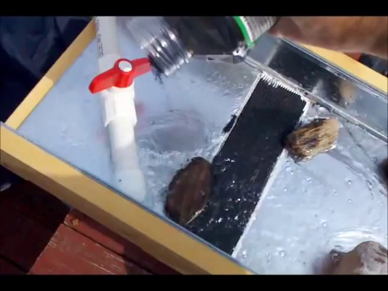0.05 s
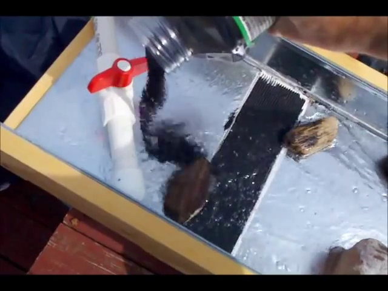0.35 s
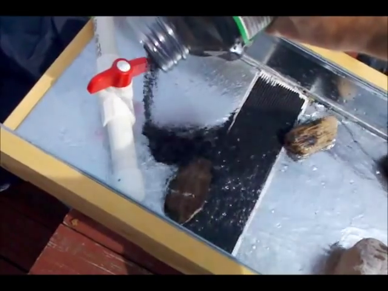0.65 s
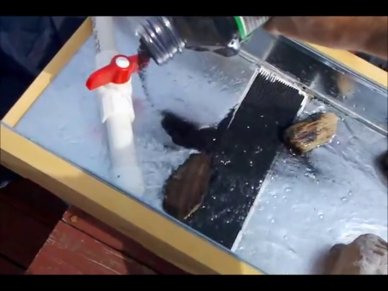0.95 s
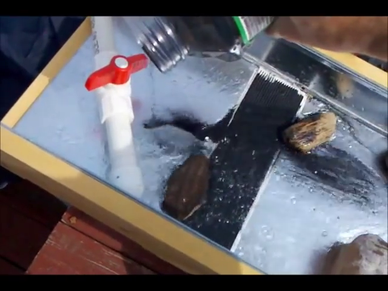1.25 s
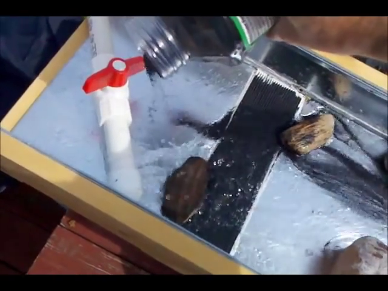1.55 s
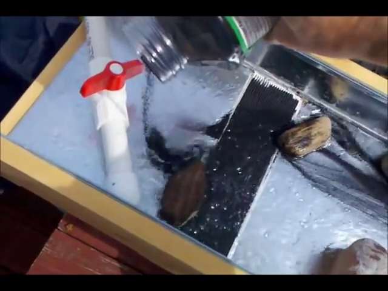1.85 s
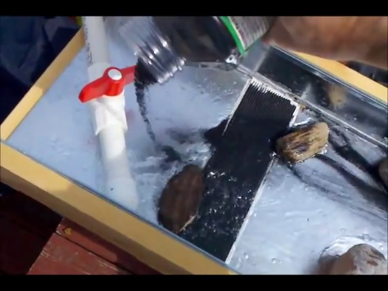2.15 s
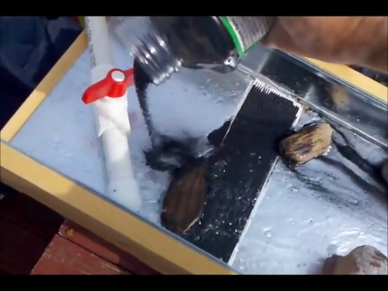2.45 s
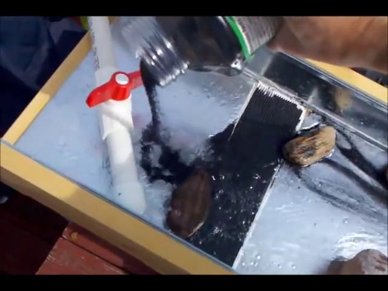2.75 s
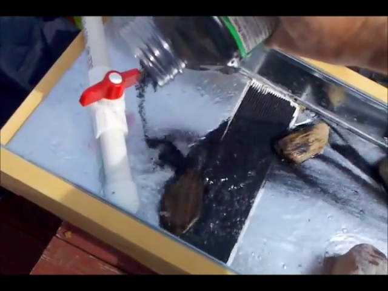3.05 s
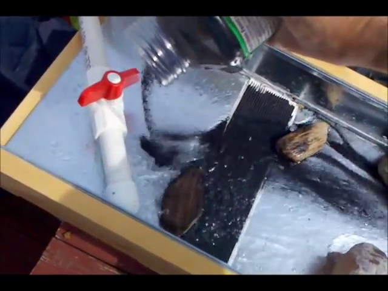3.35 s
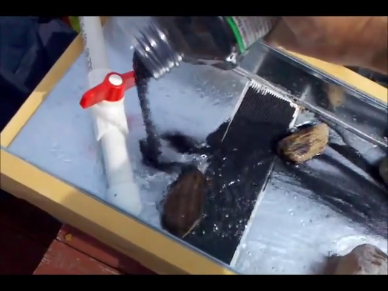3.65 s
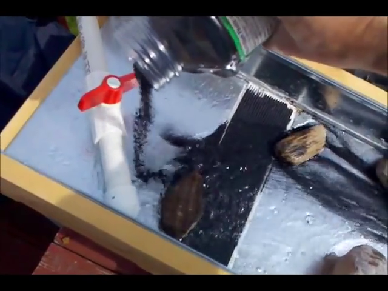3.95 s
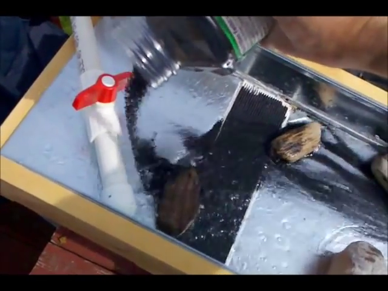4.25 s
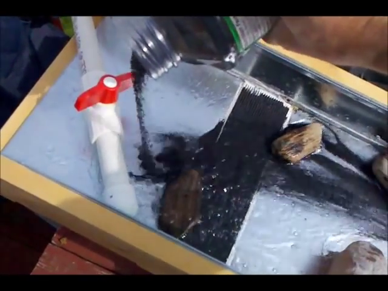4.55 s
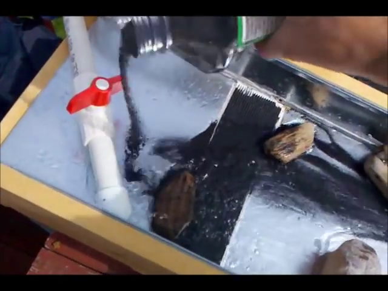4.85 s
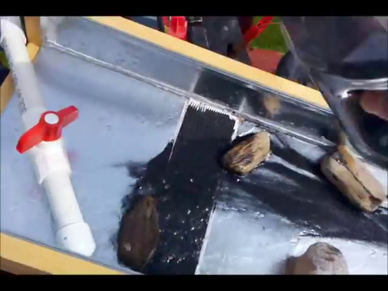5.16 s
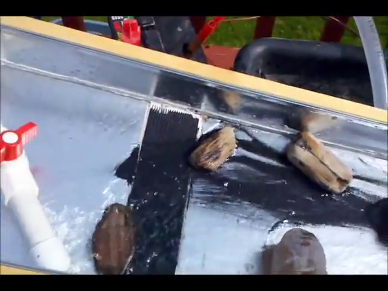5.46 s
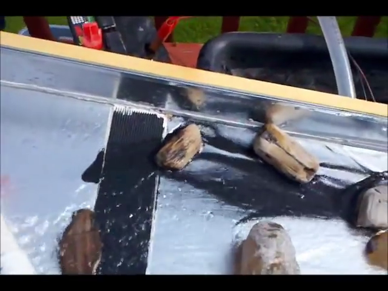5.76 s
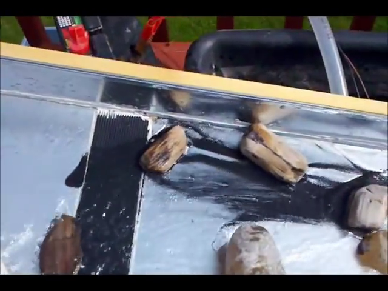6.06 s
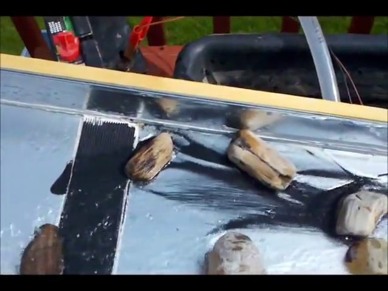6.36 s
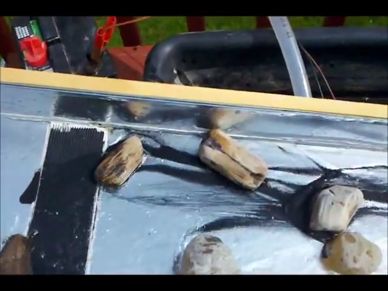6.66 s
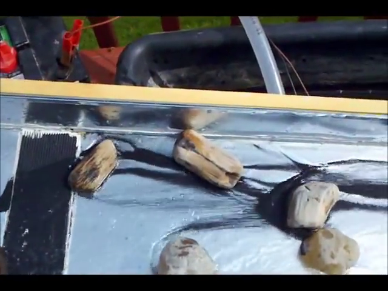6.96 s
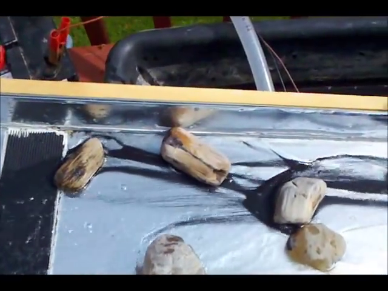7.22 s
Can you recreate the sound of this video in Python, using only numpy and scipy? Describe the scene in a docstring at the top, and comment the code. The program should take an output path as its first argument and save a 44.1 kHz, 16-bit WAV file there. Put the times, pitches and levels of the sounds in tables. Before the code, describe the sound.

A low pump hum and a hollow, pulsing pipe drone run under the steady gurgle and fizz of water flowing into a metal tray outdoors. Occasional high drop ticks and soft plips sound close to the microphone. In the last third, the microphone shifts along the tray with a few brief wind rumbles, and a brighter trickle around stones rises, with little splashes, more bubbles and a slightly stronger whine from the pump.

```python
"""A small pump feeds water from a plastic pipe into a shallow metal tray outdoors.
From the start the pump hums, the pipe booms and throbs hollowly, and the outflow churns and sprays.
Soon bubbles plip and drops tick close to a hand-held microphone with two ports (sound openings).
After five seconds a few puffs of air brush it as it moves along the tray to some stones. There
ripples splash, and the trickle of the water and the whine of the nearby pump grow louder."""
import sys
import numpy as np
from scipy import signal
from scipy.io import wavfile

SR = 44100
rng = np.random.default_rng(int(sys.argv[2]) if len(sys.argv) > 2 else 0)


def transcribe(u):
    """Save the signal u as a 16-bit wav file named by the first command-line argument.

    u: samples, shape (n,) or (channels, n), limited to [-1, 1]; the rate is SR.
    q: integer samples, one column per channel.
    """
    v = np.clip(np.atleast_2d(u).T, -1, 1)
    q = np.round(v * 32767).astype(np.int16)
    wavfile.write(sys.argv[1], SR, q)


N = 330309
TIME = np.arange(N) / SR
PUMP_HZ = 95.6

# How alike the two ports hear the water. Each row: frequency in Hz, likeness (1 means the same).
PORT_LIKENESS = [(40, 0.0088), (110, 0.88), (220, 0.95), (370, 0.92), (520, 0.81), (700, 0.51),
                 (1000, 0.026), (2000, 0.095), (14000, 0.43)]
# Tone of the water at the stones. Each row: frequency in Hz, relative strength in dB.
TRICKLE_TONE = [(2800, -27), (3300, -5), (4000, -15.5), (4900, 2), (5500, -7.5), (7000, -10.5), (9500, -5)]


def from_db(db):
    """Turn decibels into a number to multiply by."""
    return 10 ** (np.asarray(db) / 20)


def rms_one(x):
    """Scale a signal so that its average strength (rms) is 1."""
    return x / np.sqrt(np.mean(x ** 2) + 1e-20)


def in_time(rows):
    """Join rows of time and value into a curve with a value for every sample."""
    return np.interp(TIME, *np.transpose(rows))


def at_hz(rows, hz):
    """Read a table at one frequency, with all octaves equally wide."""
    frequencies, values = np.transpose(rows)
    return np.interp(np.log(hz), np.log(frequencies), values)


def along_tray(at_outlet, change):
    """A value that shifts by `change` as the microphone moves from the outlet to the stones."""
    # The microphone's path. Each row: time in seconds, place (0 at the outlet, 1 at the stones).
    path = [(0.0, 0.3), (5.1, 0.064), (5.7, 0.67), (6.15, 0.55), (6.45, 1), (6.85, 0.98), (7.49, 0.8)]
    return at_outlet + change * in_time(path)


def drift(rate):
    """A smooth random wobble of typical size 1 that turns about `rate` times a second."""
    step = 40   # samples between random values
    keep = np.exp(-2 * np.pi * rate * step / SR)
    noise = rng.standard_normal(N // step + 2002)
    slow = signal.lfilter([1], [1, -2 * keep, keep * keep], noise)[2000:]
    return np.interp(np.arange(N) / step, np.arange(len(slow)), rms_one(slow))


def swell(middle_s, db, half_s):
    """A smooth rise and fall of level around one moment."""
    return from_db(db) * np.exp(-((TIME - middle_s) / half_s) ** 2)


def ring(drive, hz, fade_s):
    """Each click in `drive` starts a tone that fades by 60 dB in `fade_s` seconds."""
    keep = from_db(-60 / (fade_s * SR))
    angle = 2 * np.pi * hz / SR
    return signal.lfilter([0, np.sin(angle)], [1, -2 * keep * np.cos(angle), keep * keep], drive + 1e-18)


def delayed(x, samples):
    """Make a signal some samples late."""
    return np.interp(np.arange(N) - samples, np.arange(N), x)


def at_ports(x, lag, tilt_db):
    """The first port hears a source `lag` samples later and `tilt_db` louder than the second."""
    first, second = np.broadcast_to(x, (2, N))
    return np.array([delayed(first, lag) * from_db(tilt_db / 2), second * from_db(-tilt_db / 2)])


def partly_alike(common, apart, hz):
    """Mix two signals into a pair that is as alike as the ports are at this frequency."""
    alike = at_hz(PORT_LIKENESS, hz)
    return np.sqrt(1 + alike) * common + np.sqrt(1 - alike) * apart * [[1], [-1]]


def rush(tone, flicker_db, flicker_rate):
    """Rushing noise at both ports, made of narrow bands that flicker partly together."""
    out, together = 0, drift(flicker_rate)
    white = rng.standard_normal((2, 2, N))
    edge = 2 ** (1 / 6)   # each band is a third of an octave wide
    for k, hz in enumerate(14000 / 2 ** (np.arange(27) / 3)):
        if tone[0][0] / edge < hz < tone[-1][0] * edge:
            band = signal.butter(2, [hz / edge, hz * edge], "band", fs=SR, output="sos")
            common, apart = signal.sosfilt(band, white[k % 2])
            gain = from_db(at_hz(tone, hz) + flicker_db * (together + drift(flicker_rate)))
            out = out + gain * partly_alike(common, apart, hz)
    return rms_one(out)


def bubbles(tone, range_hz, per_s, cycles, spread_db, clump_db, pitches=24):
    """Bubbles of random strength are born in clumps; each rings for some cycles at one of the pitches."""
    born = np.flatnonzero(rng.random(N) < per_s * from_db(clump_db * drift(15)) / SR)
    strength = from_db(spread_db * np.minimum(rng.exponential(1, N), 4))[born]
    common, apart = rng.uniform(-1.3, 1, (2, N))[:, born]
    chosen_pitch = rng.integers(0, pitches, N)[born]
    out = 0
    for k, hz in enumerate(np.geomspace(*range_hz, pitches)):
        clicks = np.zeros((2, N))
        clicks[:, born] = (chosen_pitch == k) * strength * partly_alike(common, apart, hz)
        out = out + hz * from_db(at_hz(tone, hz)) * ring(clicks, hz, cycles / hz)
    return rms_one(out)


def air_puffs():
    """Moving air rumbles in each port on its own."""
    # Each row: middle of the puff in seconds, level in dB, half its length in seconds.
    puffs = [(5.034, -49, 0.0091), (5.372, -30.5, 0.025), (5.7, -47, 0.13), (5.824, -25, 0.029),
             (7.142, -30.5, 0.033)]
    band = signal.butter(2, [56.6, 150], "band", fs=SR, output="sos")
    rumble = rms_one(signal.sosfilt(band, rng.standard_normal((2, N))))
    return rumble * sum(swell(*puff) for puff in puffs)


def pump(phase):
    """The turning pump hums and whines at multiples of its rate; the high tones waver most."""
    # Loudness of the hum. Each row: time in seconds, level in dB.
    hum_levels = [(0.0, -40.5), (0.9, -39), (1.5, -38), (2.0, -40), (4.2, -40), (4.8, -38), (5.95, -38),
                  (6.6, -36), (7.49, -35)]
    # Tones of the hum and of the whine. Each row: multiple of the pump rate, relative level in dB.
    hum_tones = [(1.5, -10), (5, 1), (8, -20.5), (9, -17.5), (10, -24), (12, -22)]
    whine_tones = [(9, -9), (12, -32), (13, -10), (15, -7.5), (17, -10.5), (20, -14)]
    whine_db = along_tray(-56.5, change=10.5)   # the pump is close to the stones
    gains = {}
    for tones, level_db in ((hum_tones, in_time(hum_levels)), (whine_tones, whine_db)):
        for multiple, db in tones:
            gains[multiple] = gains.get(multiple, 0) + from_db(level_db + db)
    out = 0
    for multiple, gain in gains.items():
        waver_db = multiple * (-0.1 * drift(4.4) + 0.12 * drift(34))   # slow sway and fast flutter
        out = out + gain * from_db(waver_db) * np.sin(multiple * phase + rng.uniform(0, 2 * np.pi))
    return at_ports(out, lag=along_tray(1.5, change=-1), tilt_db=along_tray(-2.5, change=2))


def trickle():
    """A thin sheet of water laps round the stones with a bright patter, small crackles and a fine mist."""
    # Loudness of the mist. Each row: time in seconds, level in dB.
    mist_levels = [(0.0, -47.5), (1.1, -45), (2.1, -45.5), (3.2, -46), (4.4, -46.5), (5.15, -47.5),
                   (5.75, -43.5), (6.3, -43.5), (6.65, -43), (6.83, -37.5), (6.95, -45.5), (7.1, -41),
                   (7.3, -46), (7.49, -43)]
    # Tone of the mist. Each row: frequency in Hz, relative strength in dB.
    mist_tone = [(8000, 6.4), (9500, 8.5), (11500, 4.1), (14000, 4.6)]
    lap_db = 1.6 * drift(9.9)
    ripple = rush(TRICKLE_TONE, flicker_db=2.27, flicker_rate=40)
    patter = bubbles(TRICKLE_TONE, (3130, 8070), per_s=1100, cycles=280, spread_db=-1.5, clump_db=-0.5)
    crackle = bubbles(TRICKLE_TONE, (3400, 7000), per_s=120, cycles=16,
                      spread_db=2.5, clump_db=2, pitches=8)
    sheet = ripple + from_db(-2.5) * patter + from_db(-9) * crackle
    sheet_db = along_tray(-55, change=5.5)
    mist = from_db(in_time(mist_levels) + 1.5) * rush(mist_tone, flicker_db=1.64, flicker_rate=27)
    return at_ports(from_db(lap_db) * (from_db(sheet_db) * sheet + mist), lag=0, tilt_db=-0.5)


def splashes():
    """A ripple breaks on a stone and throws a brief shower of tiny bubbles."""
    # Each row: middle of the splash in seconds, level in dB, half its length in seconds, pitch in Hz.
    ripples = [(5.51, -36.5, 0.0086, 8600), (5.792, -36, 0.021, 7700), (6.125, -38.5, 0.02, 7140),
               (6.822, -37, 0.022, 8800), (7.092, -39.5, 0.018, 8400)]
    out = 0
    for middle_s, db, half_s, hz in ripples:
        shower = bubbles(TRICKLE_TONE, (hz * .8, hz * 1.15), per_s=3000, cycles=30,
                         spread_db=1.5, clump_db=0, pitches=5)
        out = out + swell(middle_s, db, half_s) * shower
    return out


def drops(rows, rise_s, fade_s, splash_db, splash_fade_s):
    """Each drop pinches off one ringing bubble and leaves a short, noisy splash round the same pitch."""
    out, t = np.zeros((2, N)), TIME[:SR // 20]
    attack = np.minimum(t / rise_s, 1)
    age = np.maximum(t - rise_s, 0)
    for start_s, db, hz in rows:
        bubble = np.sin(2 * np.pi * hz * t) * from_db(-60 * age / fade_s)
        band = signal.butter(4, [hz * .7, hz * 1.4], "band", fs=SR, output="sos")
        noise = rms_one(signal.sosfilt(band, rng.standard_normal((2, len(t)))))
        splash = np.tanh(noise) * from_db(splash_db - 60 * age / splash_fade_s)
        drop = from_db(db) * attack * (bubble * [[1], [.3]] + splash)   # louder in the first port
        start = round(start_s * SR)
        out[:, start:start + len(t)] += drop[:, :N - start]
    return out


def plips():
    """Single bubbles ring softly among the stones."""
    # Each row: start in seconds, level in dB, pitch in Hz.
    single_bubbles = [(0.832, -26.5, 1690), (0.84, -30, 1820), (3.564, -37, 4040), (4.128, -36, 5340),
                      (5.731, -28.5, 3940), (5.794, -29, 5950), (6.292, -35, 4220), (6.314, -36.5, 4000),
                      (6.37, -28.5, 3770), (6.397, -31, 4900), (6.451, -34.5, 4400), (6.599, -33, 3750),
                      (6.692, -32, 4450), (6.839, -33.5, 3950), (7.153, -35.5, 4120), (7.212, -34.5, 3600)]
    return drops(single_bubbles, rise_s=.001, fade_s=.012, splash_db=-7, splash_fade_s=.028)


def ticks():
    """Drops burst close to the microphone with a sharp, high tick."""
    # Each row: start in seconds, level in dB, pitch in Hz.
    close_drops = [(1.4691, -26, 6470), (1.6193, -19.5, 8640), (1.7998, -20, 9180), (1.8881, -10.5, 9170),
                   (2.3878, -25, 8800), (3.0448, -27, 9270), (3.5847, -22, 6470), (3.9329, -18.5, 8850),
                   (4.1708, -25, 9300), (4.172, -20, 9300), (5.0376, -14.5, 9000), (5.3537, -25, 9100),
                   (5.3614, -24.5, 9100), (5.4026, -21, 8890), (5.5046, -24, 8610), (6.7928, -24.5, 9000)]
    return drops(close_drops, rise_s=.0003, fade_s=.005, splash_db=-7.5, splash_fade_s=.016)


def pipe(phase):
    """The pipe booms at four times the pump rate and throbs just below; swirling water keeps it ringing."""
    # Each row: middle of the throb in seconds, level in dB.
    throbs = [(0.08, -34), (0.2, -27.5), (0.749, -31), (0.95, -29.5), (1.26, -29), (1.38, -27.5),
              (1.579, -26), (1.78, -33), (1.91, -33), (2.08, -28), (2.21, -30), (2.37, -25.5), (2.53, -32),
              (2.68, -31), (2.8, -32), (3.06, -29.5), (3.35, -31.5), (3.54, -29.5), (3.64, -36),
              (3.83, -28), (4.09, -30), (4.57, -28.5), (4.76, -28.5), (4.93, -30.5), (5.51, -34),
              (5.65, -31), (5.79, -30), (6.211, -26), (6.41, -29), (6.6, -28.5), (6.7, -35), (6.92, -29)]
    multiple, ring_hz, ring_width_hz = 4, 374, 24
    boom = from_db(-37.3) * np.sin(multiple * phase)
    for middle_s, db in throbs:
        throb_hz = rng.normal(370.4, 2.5)
        sag_hz = multiple * PUMP_HZ - throb_hz
        throb = np.sin(multiple * phase - 2 * np.pi * sag_hz * (TIME - middle_s))
        boom = boom + swell(middle_s, db, half_s=.05) * throb
    fade_s = np.log(1000) / (np.pi * ring_width_hz)
    hollow = rms_one(ring(rng.standard_normal(N), ring_hz, fade_s))
    return at_ports(boom + from_db(-40) * hollow, lag=0.63, tilt_db=0.7)


def spray():
    """The jet breaks on the tray: a spitting hiss of tiny bursting bubbles, and sparse sharp spatter."""
    # Loudness of the spray. Each row: time in seconds, level in dB.
    levels = [(0.0, -44.5), (1.1, -43.5), (1.85, -43.5), (2.1, -46.5), (2.6, -42.5), (3.7, -43.5),
              (5.2, -43.5), (5.5, -43.5), (6.15, -43), (6.6, -44.5), (6.85, -45), (7.3, -50), (7.49, -45.5)]
    # Tone of the spray. Each row: frequency in Hz, relative strength in dB.
    tone = [(4500, -39), (5500, -1), (6600, -4), (7700, 9.5), (8700, 6.5), (10200, -51), (12000, -71)]
    hiss = rush(tone, flicker_db=1.7, flicker_rate=36)
    fizz = bubbles(tone, (5260, 11490), per_s=2800, cycles=270, spread_db=4.5, clump_db=4)
    spatter = bubbles(tone, (6000, 11000), per_s=130, cycles=30, spread_db=2, clump_db=2, pitches=10)
    jet = from_db(-0.5) * hiss + from_db(-3.5) * fizz + from_db(-12) * spatter
    spit_db = 1.5 * drift(15)
    return from_db(in_time(levels) + spit_db) * jet


def outflow():
    """Churning water traps air: big bubbles gurgle, smaller ones babble as it washes over the tray."""
    # Loudness of the deep rumble, the churning and the wash. Each row: time in seconds, level in dB.
    rumble_levels = [(0.0, -36.5), (0.7, -35.5), (0.95, -32.5), (1.5, -34.5), (2.4, -37.5), (3.2, -33.5),
                     (4.4, -36.5), (5.1, -34.5), (5.4, -30.5), (5.8, -29.5), (6.25, -33.5), (7.49, -32.5)]
    churn_levels = [(0.0, -39), (0.35, -39), (0.6, -40.5), (0.85, -37), (1.0, -36), (1.15, -40.5),
                    (1.42, -37.5), (1.9, -39.5), (2.4, -41.5), (3.2, -41), (3.8, -40.5), (4.38, -42),
                    (5.1, -41), (5.35, -39), (5.72, -36.5), (5.95, -39.5), (6.32, -40), (6.55, -38),
                    (7.0, -39.5), (7.49, -40)]
    wash_levels = [(0.0, -48), (0.45, -45), (0.7, -46), (1.5, -45), (2.3, -47.5), (3.5, -46), (4.3, -47.5),
                   (5.5, -45.5), (6.05, -47.5), (6.4, -45.5), (7.0, -45), (7.49, -45)]
    # Tone of the same three sounds. Each row: frequency in Hz, relative strength in dB.
    rumble_tone = [(45, -29), (70, -18), (110, -10), (160, -9), (220, -4), (290, -0.5), (340, 2)]
    churn_tone = [(400, -6), (520, -5), (650, -12), (875, -16)]
    wash_tone = [(1100, -23), (1700, -21), (2400, -26), (3300, -31.5)]
    rumble = rush(rumble_tone, flicker_db=0.47, flicker_rate=17)
    churn = rush(churn_tone, flicker_db=1, flicker_rate=12)
    gurgle = bubbles(churn_tone, (394.5, 957), per_s=400, cycles=19, spread_db=1.5, clump_db=2, pitches=14)
    wash = rush(wash_tone, flicker_db=2, flicker_rate=18)
    babble = bubbles(wash_tone, (1000, 2170), per_s=600, cycles=31, spread_db=1, clump_db=1.5, pitches=12)
    water = from_db(in_time(rumble_levels)) * rumble
    water += from_db(in_time(churn_levels)) * (from_db(0.1) * churn + from_db(-3.5) * gurgle)
    water += from_db(in_time(wash_levels)) * (from_db(-3.5) * wash + from_db(-5) * babble)
    return at_ports(water, lag=7.4, tilt_db=-2)


def scene():
    """All the sounds at the two ports; the pump's speed wavers slightly with the load."""
    rate_hz = PUMP_HZ * (1 + 0.00091 * drift(1.53))
    phase = 2 * np.pi * np.cumsum(rate_hz) / SR
    drips = ticks() + plips()
    return pump(phase) + pipe(phase) + outflow() + spray() + trickle() + splashes() + drips + air_puffs()


def record(dry):
    """Each channel is one port minus the other delayed, which aims it sideways; bass and top are cut."""
    other = np.array([delayed(port, samples=17) for port in dry[::-1]])
    other_lows = signal.fftconvolve(other, signal.firwin(45, 4600, fs=SR)[None], mode="same", axes=1)
    treble_share = 0.35   # the aim is weaker in the treble
    aimed = dry - (other_lows + treble_share * (other - other_lows))
    bass_cut = signal.butter(2, 45, "high", fs=SR, output="sos")
    top_cut = signal.ellip(12, .1, 80, 14000, fs=SR, output="sos")
    return signal.sosfilt(top_cut, signal.sosfilt(bass_cut, aimed))


dry = scene()
out = record(dry)
transcribe(out)
```